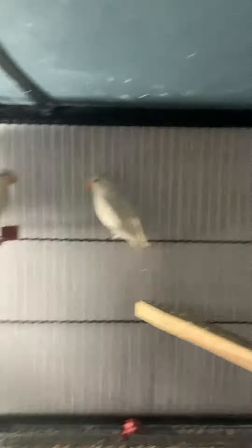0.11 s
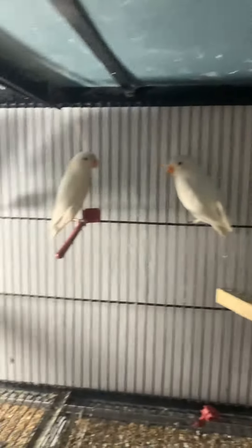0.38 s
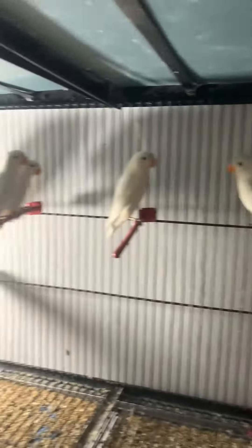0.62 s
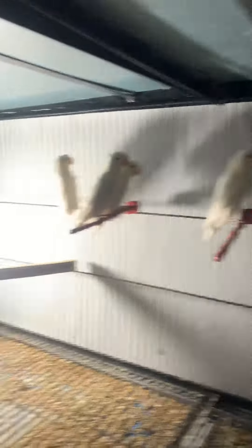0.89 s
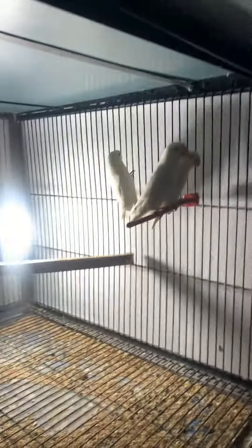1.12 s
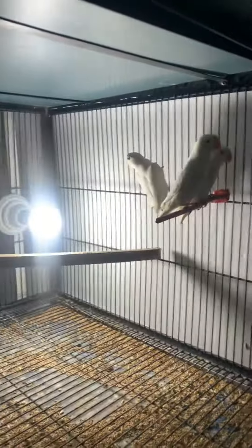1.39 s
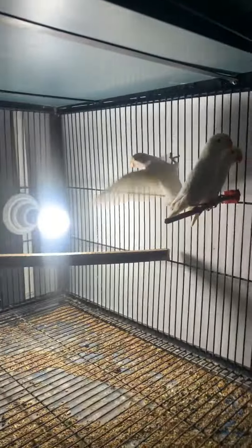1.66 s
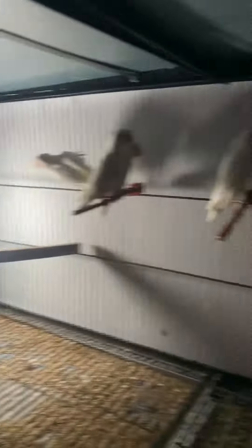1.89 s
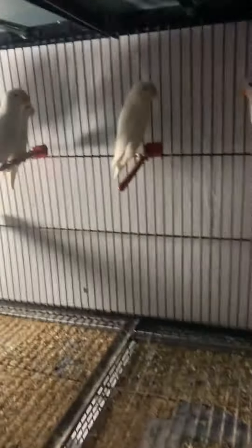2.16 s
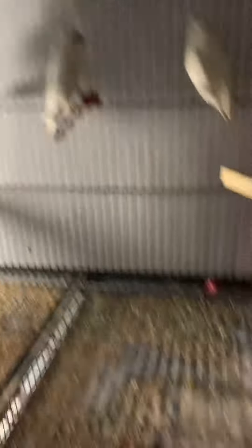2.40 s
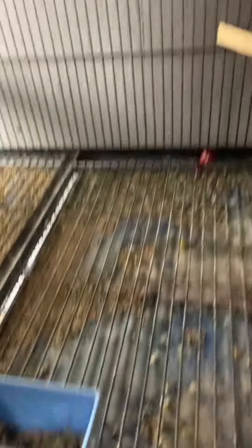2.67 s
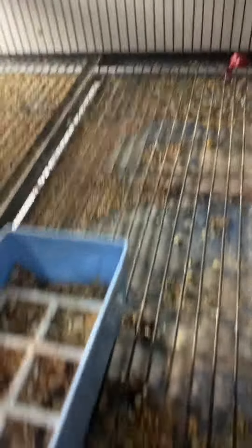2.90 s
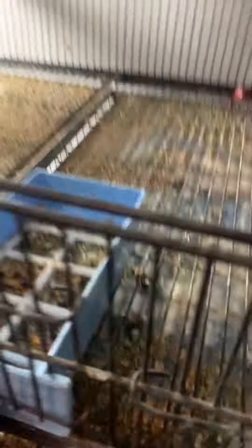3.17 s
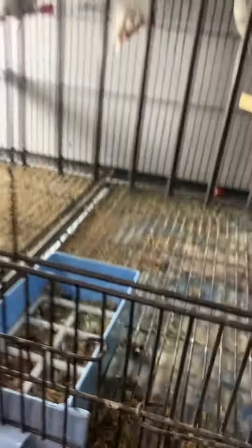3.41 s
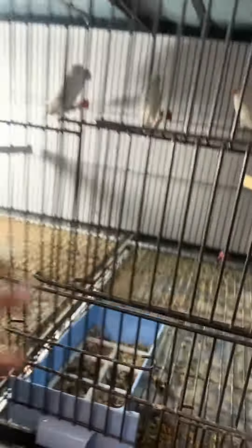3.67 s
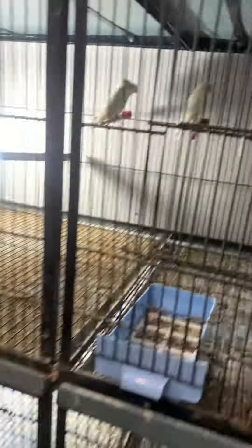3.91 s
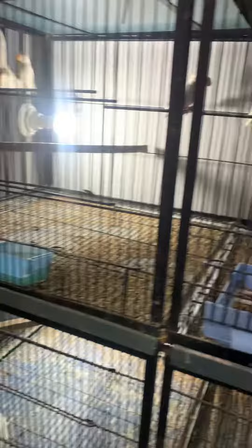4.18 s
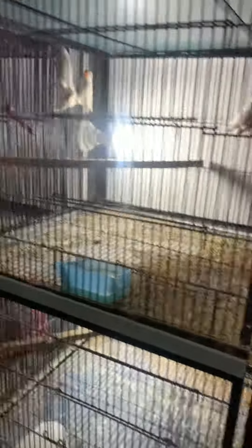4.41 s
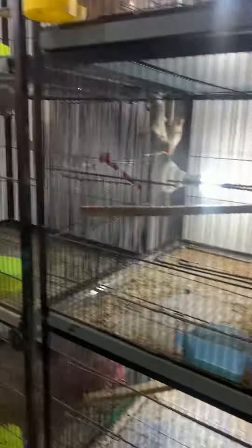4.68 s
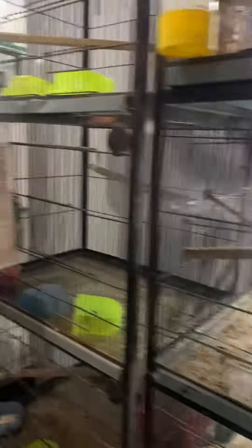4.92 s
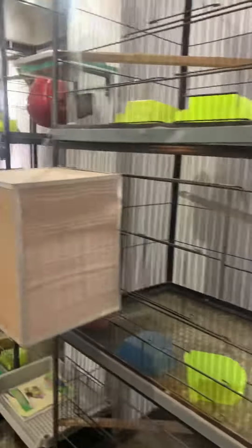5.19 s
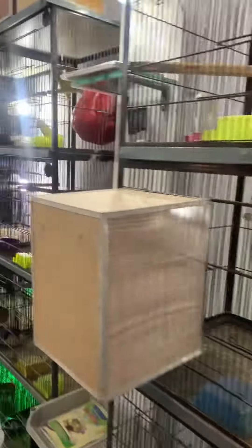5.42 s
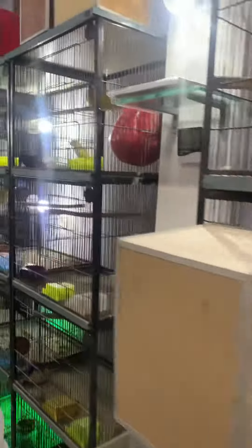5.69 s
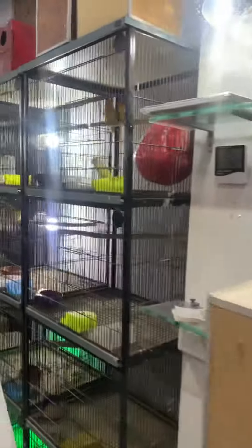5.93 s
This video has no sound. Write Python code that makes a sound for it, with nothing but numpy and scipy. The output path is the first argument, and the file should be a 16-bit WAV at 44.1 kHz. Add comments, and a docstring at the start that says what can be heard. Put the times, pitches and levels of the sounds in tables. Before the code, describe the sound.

A phone moves through a hard-walled bird room. Faint distant whistles echo over a wavering low hum and soft rumble, then a very brief close chirp whips upward. Calls grow brighter, cage wire ticks and rattles, and handling swells. A second sharp chirp lands amid the busiest clatter. Afterwards the ticking stops, a thin low tone fades, and scattered bird calls become denser and louder toward the end.

```python
"""Six seconds among small caged parrots in a hard-walled bird room, on a moving phone with two microphone ports.
From the start a wavering hum, a low rumble and rustle (sine and coloured noise) swell as the phone is carried
about, and distant birds call: harmonic whistles with sparse echoes and a trailing hiss. After a second, claws
and husks tick on cage wire as noise bursts through resonators; near 1.8 and 3.1 s a chirp sweeps up close by.
A thin steady tone sets in at 3.9 s and fades."""
import sys
import numpy as np
from scipy import signal
from scipy.fft import rfft, irfft, next_fast_len
from scipy.io import wavfile
from scipy.ndimage import uniform_filter1d

SR = 44100
rng = np.random.default_rng(int(sys.argv[2]) if len(sys.argv) > 2 else 0)


def makeup_ratio(level_db):
    """Linear amplitude ratio for a level in decibels (20 dB per factor of ten)."""
    decades = np.asarray(level_db, float) / 20
    return 10 ** decades


def unload_audio(sound):
    """Save the sound as a 16-bit wav file, at the path given as the first command line argument."""
    columns = np.transpose(np.atleast_2d(sound))
    # keep every value between -1 and 1, then stretch to whole-number steps
    steps = np.round(np.clip(columns, -1, 1) * 32767)
    wavfile.write(sys.argv[1], SR, steps.astype(np.int16))


N = 267422


def evened(x):
    """Scales to rms 1."""
    return x / np.sqrt(np.mean(x ** 2) + 1e-20)


def read(points, hz):
    """Reads a spectrum on a log-frequency axis."""
    f, value = np.transpose(points)
    return np.interp(np.log(hz + 1), np.log(f + 1), value)


def add(mix, s, sound):
    """Mixes a sound in at s seconds."""
    part = mix[round(s * SR):][:len(sound)]
    part += sound[:len(part)]


def slow(count, span):
    """Smooth random wander of rms 1 that changes over span seconds."""
    size = max(round(span * SR), 1)
    once = uniform_filter1d(rng.standard_normal(count), size)
    return evened(uniform_filter1d(once, size))


def noise(spectrum, patchy_db):
    """Two unrelated channels of coloured noise, rms 1, with patches that drift in time and frequency."""
    frames, hz = N // 256 + 5, np.fft.rfftfreq(1024, 1 / SR)
    z = rng.standard_normal((frames, 513, 5)).T
    patches = evened(uniform_filter1d(uniform_filter1d(z[4], 10, 0), 8, 1))
    gain = makeup_ratio(read(spectrum, hz)[:, None] + patchy_db * patches)
    bins = (z[:2] + 1j * z[2:4]) * gain
    return evened(signal.istft(bins, nperseg=1024, noverlap=768)[1][:, :N])


def handling(count):
    """Fingers shifting on the phone: short dull grains of scattered pitch and size."""
    out, t = np.zeros(N), np.arange(1500) / SR
    for hz in np.geomspace(170, 600, count):
        struck = rng.random(N) < 9 / SR  # nine grains a second at each pitch
        sizes = makeup_ratio(2.26 * np.minimum(rng.exponential(1, N), 4)) * struck
        grain = np.sin(2 * np.pi * hz * t) * t * hz * np.exp(-t * hz / 4.7)
        out += signal.oaconvolve(sizes, grain)[:N]
    return evened(out)


def distant_notes():
    """All far notes as (start s, length s, first Hz, last Hz, level dB, harshness); held ones sag in pitch."""
    # Held notes. Each row: start in seconds, length in seconds, pitch in Hz, level in dB, harshness 0-1.
    held = [(0.073, 0.045, 3710, -57, 0.56), (0.087, 0.072, 4140, -44.5, 0.58),
            (0.096, 0.06, 5730, -41, 0.66), (0.155, 0.064, 5250, -37, 0.68), (0.219, 0.11, 4400, -42, 0.68),
            (0.223, 0.12, 5010, -39, .45), (0.229, 0.14, 2233, -51.5, 0.57), (0.314, 0.084, 3294, -54, 0.8),
            (0.4, 0.082, 2170, -51, 0.37), (0.601, 0.066, 4350, -45, 0.64),
            (0.646, 0.042, 6180, -52.5, 0.72), (0.723, 0.048, 3694, -49.5, 0.67),
            (0.773, 0.046, 2000, -53.5, 0.4), (1.031, 0.12, 1466, -52, 0), (1.289, 0.062, 3580, -53, 0.89),
            (1.609, 0.09, 3755, -68, 0.66), (1.625, 0.052, 6200, -51, 0.29), (1.876, 0.022, 3180, -40, 1),
            (1.912, 0.055, 6390, -35, .65), (1.956, 0.025, 2450, -35.5, 0.23), (1.97, 0.11, 3750, -43, 0),
            (2.155, 0.058, 6050, -35.5, 0.68), (2.224, 0.035, 2170, -36, 0.78),
            (2.246, 0.075, 3550, -30, 0.14), (2.347, 0.053, 5870, -31.5, 0.45),
            (2.356, 0.068, 2976, -41, 0.25), (2.418, 0.071, 6134, -29, 0.26),
            (2.423, 0.061, 4950, -27, 0.88), (2.53, 0.087, 4190, -38.5, .85),
            (3.257, 0.076, 6360, -36.5, .8), (3.288, 0.059, 5200, -37.5, .75),
            (3.817, 0.019, 1800, -26, 0.34), (4.045, 0.072, 3074, -41.5, 0.61),
            (4.086, 0.054, 4494, -36.5, 0.16), (4.245, 0.091, 5850, -34.5, .85),
            (4.259, 0.035, 3070, -28, 0.28), (4.331, 0.042, 2545, -38.5, 1), (4.368, 0.04, 3403, -31, 0.1),
            (4.571, 0.034, 4340, -45.5, 0.99), (4.881, 0.098, 2838, -50.5, 0.43),
            (5.074, 0.081, 6840, -52.5, 1), (5.231, 0.039, 3010, -51, 0.94), (5.335, 0.05, 2574, -43.5, 1),
            (5.361, 0.052, 3880, -36, 0.73), (5.377, 0.051, 5100, -34.5, .15),
            (5.562, 0.033, 3040, -33.5, 0.08), (5.598, 0.031, 5320, -38, 0.6),
            (5.6, 0.026, 2360, -37, 0.93), (5.623, 0.038, 3910, -31, 0.3), (5.665, 0.02, 5350, -44, 0.3),
            (5.712, 0.036, 3070, -34, 0.2), (5.912, 0.027, 4560, -26, 0.81),
            (5.924, 0.034, 3070, -40, 0.88), (5.995, 0.037, 3050, -31.5, 1), (6.026, 0.03, 3850, -20, 0.45)]
    # Gliding notes. Each row: start and length in seconds, first and last pitch in Hz, level in dB, harshness 0-1.
    gliding = [(1.592, 0.14, 1657, 2058, -44, 0.89), (1.891, 0.057, 4660, 4380, -28, 0.5),
               (2.185, 0.056, 4035, 3823, -30.5, 0.3), (3.971, 0.056, 4273, 4094, -37, 0.62),
               (4.226, 0.07, 4335, 4640, -27, 0.5), (4.288, 0.061, 3765, 3530, -24.5, 0.38),
               (5.253, 0.078, 3940, 3760, -41.5, 1), (5.31, 0.07, 4420, 4740, -37, 0.9),
               (5.481, 0.052, 3984, 4134, -38.5, 0.55), (5.674, 0.048, 2468, 3010, -30.5, 0.36),
               (5.712, 0.019, 6420, 6200, -35, 0), (5.727, 0.035, 4500, 4446, -24, 0.34),
               (5.923, 0.044, 6750, 5900, -25.5, 0.78), (5.949, 0.055, 4130, 3550, -20.5, 0.38)]
    sag_per_s = 0.1195  # share of the pitch lost a second
    sagging = [(s, length, hz, hz * (1 - sag_per_s * length), db, harsh) for s, length, hz, db, harsh in held]
    return sagging + gliding


def flock_hiss(high):
    """A broad hiss that swells after each distant note and hangs in the room, and rides on the high rustle."""
    # Colour of the hiss. Each row: frequency in Hz, relative level in dB.
    hiss = [(1200, -41.5), (2500, 9), (4200, 12.5), (6300, 8.5), (8000, 1.5), (10500, -4.5), (12300, -1),
            (14000, -21), (16000, -23)]
    over_note_db, over_rustle_db = -10.5, -3
    rise_s, fall_s = 0.021, 0.073  # time constants of the power
    power, t = np.zeros(N), np.arange(SR) / SR
    swell = (1 - np.exp(-t / rise_s)) * np.exp(-t / fall_s)
    for s, length, _, _, db, _ in distant_notes():
        add(power, s, makeup_ratio(2 * (db + over_note_db)) * length / 0.065 * swell)  # longer notes leave more
    power += (makeup_ratio(over_rustle_db) * high) ** 2
    return np.sqrt(power) * noise(hiss, 4.7)


def background():
    """Lumpy rumble, frequency-wavering hum, thin tone, rustle and hiss, each on its own slow level."""
    # Swells as the phone is carried. Each row: time in seconds, rumble level in dB, low rustle level in dB.
    rustle = [(0.0, -60, -47), (0.17, -55, -56), (0.24, -42, -43), (0.89, -58.5, -60), (0.93, -53, -57),
              (1.69, -46.5, -58.5), (1.74, -53, -54.5), (1.89, -52, -61.5), (2.13, -44.5, -56),
              (2.21, -53, -60.5), (2.39, -26, -42.5), (2.56, -37, -49.5), (2.75, -36.5, -36.5),
              (2.97, -41.5, -41.5), (3.02, -39, -33), (3.24, -41, -47), (3.36, -33, -37), (3.56, -33, -40),
              (3.88, -42, -42), (3.98, -41.5, -50), (4.08, -51, -53), (4.59, -58.5, -53.5),
              (5.6, -49.5, -51.5), (6.06, -54, -47)]
    # High rustle. Each row: time in seconds, level in dB before the lift in the mix.
    high_rustle = [(0.0, -63), (0.79, -69.5), (1.72, -68), (1.74, -57), (2.01, -73), (2.45, -52.5),
                   (2.48, -67.5), (2.7, -54), (2.92, -56.5), (3.0, -55), (3.04, -45), (3.05, -51),
                   (3.07, -47.5), (3.14, -54.5), (3.8, -46.5), (4.1, -60), (4.69, -52.5), (5.35, -61),
                   (5.77, -53), (6.06, -51.5)]
    # Hum strength. Each row: time in seconds, level in dB.
    hum_level = [(0.0, -62), (0.2, -46), (0.91, -65.5), (0.96, -51), (1.18, -42.5), (1.4, -59),
                 (1.55, -38.5), (1.77, -42), (1.89, -59.5), (2.19, -46.5), (2.3, -63), (2.34, -48),
                 (2.77, -52.5), (3.12, -45), (3.16, -52), (3.7, -41.5), (4.39, -65.5), (5.32, -62),
                 (5.65, -44), (5.91, -59), (5.99, -51), (6.06, -80)]
    # Hum pitch before its waver. Each row: time in seconds, pitch in Hz.
    hum_pitch = [(0, 101), (2.3, 99.46), (3.3, 108), (3.8, 108.1), (5.4, 105), (6.06, 105.6)]
    # Colours of rumble, low rustle and high rustle. Each row: frequency in Hz, relative level in dB per Hz.
    rumble_colour = [(15, -60), (28, -30), (40, -9), (50, -3.5), (75, -15.5), (90, -9.5), (130, -27),
                     (300, -41)]
    low_colour = [(60, -45), (110, 8.5), (160, 13), (250, -18.5), (420, 3), (580, -7), (750, -28),
                  (1500, -47)]
    high_colour = [(300, -18), (700, 1.5), (1300, -0.5), (2000, -3), (3000, -6.5), (5000, -13.5),
                   (9000, -25.5)]

    t = np.arange(N) / SR
    s, *levels = np.transpose(rustle)
    rumble, low = (makeup_ratio(np.interp(t, s, c)) for c in levels)
    high, hum = (makeup_ratio(np.interp(t, *np.transpose(curve))) for curve in (high_rustle, hum_level))
    rumble = rumble * makeup_ratio(1.5 * slow(N, 0.043))  # lumps
    hum_hz = np.interp(t, *np.transpose(hum_pitch)) + 2.39 * slow(N, 0.036)
    tone = np.sqrt(2) * hum * np.sin(2 * np.pi * np.cumsum(hum_hz) / SR)

    since = t - 3.9  # seconds since the thin tone set in
    thin_db = -57.5 - 8.5 * since + 0.5 * slow(N, 0.046)  # fades 8.5 dB a second, wavers slightly
    thin = np.sqrt(2) * makeup_ratio(thin_db) * np.clip(since / 0.049, 0, 1) * np.sin(2 * np.pi * 303 * t)

    low_part = low * (0.9 * noise(low_colour, 2.4) + 0.47 * handling(count=12))
    high_part = makeup_ratio(8.5) * high * noise(high_colour, 4.56)
    return tone + thin + rumble * noise(rumble_colour, 1.7) + low_part + high_part + flock_hiss(high)


def syrinx(hz, overtone_db, rough, shake, flutter):
    """A harmonic whistle through the beak; roughness shakes and bends its pitch, the membrane flutters its strength."""
    # Response of the beak. Each row: frequency in Hz, gain in dB.
    beak = [(1500, -9), (2500, 0.5), (6500, 0), (8500, -4.5), (10500, -8), (12200, 0), (13500, -8.5),
            (16000, -33)]
    hz = hz * (1 + rough * (shake * slow(len(hz), .0004) + .045 * slow(len(hz), .008)))
    turns = 2 * np.pi * (np.cumsum(hz) / SR + rng.random())
    tone = np.zeros(len(hz))
    for k in range(1, 7):
        gain = makeup_ratio(overtone_db * (k - 1) + read(beak, abs(k * hz)))
        tone += gain * np.sin(k * turns + k * k)
    return np.sqrt(2) * tone * (1 + flutter * slow(len(hz), 0.0011))


def echo(x, early_s):
    """Sparse reflections, other ones in each channel, building up over early_s; each band dies at its own speed."""
    # Decay of the hard-walled room. Each row: frequency in Hz, t60 in seconds.
    walls = [(1500, 0.33), (3000, 0.62), (6000, 0.5), (12000, 0.28)]
    taps = np.zeros((2, SR))
    at = np.arange(40, SR - 20, 20) + rng.integers(0, 20, (2, (SR - 41) // 20))
    np.put_along_axis(taps, at, rng.choice([-1., 1.], at.shape), 1)
    hz, t, z = signal.stft(taps, SR, nperseg=128)
    fall = makeup_ratio(-60 * t / read(walls, hz)[:, None]) * (1 - np.exp(-t / early_s))
    tail = signal.istft(z * fall, SR, nperseg=128)[1]
    return signal.fftconvolve(x[None], tail / np.linalg.norm(tail[0]), axes=1)[:, :N]


def far_birds():
    """Each note starts with a rasp and a quick upward scoop, then holds or glides; three cage rows echo apart."""
    # Colour of the opening rasp. Each row: frequency in Hz, relative level in dB per Hz.
    rasp_colour = [(1200, -67), (2200, -0.5), (3300, -1.5), (5500, 3.5), (7000, -10), (10000, -4),
                   (12500, -5.5), (15000, -38)]
    pure_db, harsh_db = -29, -3.5  # step from overtone to overtone of a pure and of a harsh note
    rows, rasp = np.zeros((3, N)), np.zeros(N)
    for k, (s, length, hz0, hz1, db, harsh) in enumerate(distant_notes()):
        t = np.arange(round(length * SR)) / SR
        scoop = 1 - .06 * np.exp(-t / .004)
        hz = (hz0 + (hz1 - hz0) * t / t[-1]) * scoop
        swell = makeup_ratio(db) * (1 - np.exp(-t / .005)) * np.minimum((t[-1] - t) / .012, 1)
        overtone_db = pure_db + (harsh_db - pure_db) * harsh ** 0.45
        rough = 1.081 * harsh ** 1.356
        add(rows[k % 3], s, swell * syrinx(hz, overtone_db, rough, .045, .45))
        add(rasp, s, (.15 + harsh) * swell * np.exp(-t / .045))
    rows[0] += makeup_ratio(-3.5) * rasp * noise(rasp_colour, 1.2)[0]
    return makeup_ratio(-2.0) * rows.sum(0) + makeup_ratio(1.0) * sum(echo(row, 0.0019) for row in rows)


def wire_ticks():
    """A snap, then a short rattle, coloured by the broad rings of the wire; the two lowest rings are the thud."""
    # Ticks. Each row: start in seconds, relative level in dB, dull thud against the bright part in dB, t60 in seconds.
    ticks = [(1.0723, -51, -9, 0.051), (1.16, -53, -5, 0.06), (1.528, -46.5, -27, 0.43),
             (2.2952, -27.5, -25, 0.077), (2.4177, -15.5, -36, 0.11), (2.517, -27.5, -24, 0.13),
             (2.6478, -26.5, -5, 0.1), (2.822, -32, -10, 0.061), (2.9386, -32, 0, 0.095),
             (2.957, -27, -16, 0.052), (2.9764, -10.5, -6.5, 0.046), (3.0178, -19.5, -2.5, 0.036),
             (3.0318, -13.5, 0, 0.046), (3.0678, -23, -2.5, 0.05), (3.22, -28.5, -3, 0.058),
             (3.434, -31, -16, 0.1), (3.527, -20.5, -10, 0.28), (3.581, -28.5, 4.5, 0.03),
             (3.653, -25, -19.5, 0.025), (3.7484, -31.5, 2.5, 0.39), (3.8452, -36, 2, 0.051),
             (3.8755, -30.5, -19, 0.069), (5.5974, -40, -10, 0.06)]
    # Rings of the wire. Each row: frequency in Hz, width in Hz, relative level in dB.
    wire = [(950, 1100, -3), (1580, 900, 4.5), (3100, 350, -7.5), (6500, 15500, -4.5), (9400, 1900, -8.5),
            (12600, 2000, -9)]
    out, t = np.zeros(N), np.arange(5000) / SR
    for s, db, thud_db, t60 in ticks:
        snap_and_rattle = np.exp(-t / .001) + .75 * makeup_ratio(-60 * t / t60)
        rattle = rng.standard_normal(len(t)) * snap_and_rattle * (1 - np.exp(-t / .0004))
        for k, (hz, width, ring_db) in enumerate(wire):
            ring = signal.lfilter(*signal.iirpeak(hz, hz / width, SR), rattle)
            add(out, s, makeup_ratio(db + ring_db + thud_db * (k < 2) - 2) * ring)
    return out + makeup_ratio(-11.0) * echo(out, 0.0013)


def cage(x):
    """A few strong reflections from the tray and walls close by, then the room."""
    # Nearest reflections; the opposite channel has each sooner and louder. Each row: delay in seconds, level in dB.
    reflections = [(.0021, -5), (.0037, -7), (.0056, -10), (.0083, -14), (.012, -18)]
    out = np.array([x, x])
    for k, (delay, db) in enumerate(reflections):
        out[k % 2] += makeup_ratio(db) * np.roll(x, round(delay * SR))
        out[1 - k % 2] += makeup_ratio(db + 5.5) * np.roll(x, round(0.82 * delay * SR))
    return out + makeup_ratio(-14.5) * echo(x, 0.00071)


def near_birds():
    """Short sweeping chirps, mostly direct, with the cage and room behind them."""
    # One table a close chirp, a tick and a low croak that whips up into a whistle.
    # Each row: time in seconds, pitch in Hz, level in dB, roughness from 0 to about 1.
    chirps = [
        [(1.758, 2556, -25, 1.1), (1.760, 2416, -32, 1.11), (1.763, 2200, -36, 0.77), (1.7650, 2226, -15, 0.06),
         (1.771, 2290, -13.5, 0.1), (1.7725, 2715, -18, .4), (1.775, 5120, -6.5, 0.08),
         (1.779, 6680, -10.5, 0.04), (1.787, 6450, -16.5, 0.26), (1.790, 6100, -25, .3)],
        [(3.106, 3460, -23, 0.7), (3.108, 3380, -20, .7), (3.111, 3100, -33, 0.77), (3.114, 3100, -36, 0.77),
         (3.117, 3530, -15.5, 0.55), (3.120, 4260, -11, 0.15), (3.123, 5660, -4, 0.2),
         (3.128, 6030, -12.5, 0.31), (3.134, 5695, -17.5, 0.12), (3.149, 6080, -16, 0.02),
         (3.157, 5970, -26, 0.3)],
    ]
    close = np.zeros(N)
    for rows in chirps:
        s, *columns = np.transpose(rows)
        t = np.arange(s[0], s[-1], 1 / SR)
        hz, db, rough = (np.interp(t, s, c) for c in columns)
        # overtone step in dB: all croak below 3770 Hz, all whistle above 5230 Hz
        overtone_db = np.interp(hz, [3770, 5230], [-0.5, -7])
        strength = np.sqrt(sum(makeup_ratio(2 * k * overtone_db) for k in range(4)))
        voice = syrinx(hz, overtone_db, rough, 0.136, 0.13) / strength
        add(close, s[0], makeup_ratio(db) * voice)
    return cage(close)


def scene():
    """All sources, as two unlike views of the room."""
    return background() + far_birds() + wire_ticks() + near_birds()


def roll_off(x):
    """The treble ends steeply here."""
    return signal.sosfilt(signal.butter(12, 14090, fs=SR, output="sos"), x)


def record(dry):
    """The phone: gain ducks after loud sound, microphones roll off, ports share sound out of phase."""
    # The two ports. Each row: frequency in Hz, likeness 0-1, lead of the left port in radians.
    port_table = [(0, .95, 0), (250, .85, -.2), (430, .68, -.2), (600, .6, -1.4), (750, .65, -3.1),
                  (1030, .6, -3.6), (1650, .3, -5.3), (2200, .5, -3.6), (2900, .55, -3.5), (3900, .5, -4.7),
                  (4600, .8, -3.5), (5300, .75, -3), (5990, .55, -1.3), (6700, .95, -.1), (7400, .98, 0),
                  (8400, .55, 1.6), (9300, .99, 3.1), (10200, .99, 3.2), (11150, .6, 5.1),
                  (11900, .96, 6.1), (13200, .9, 6.6), (13900, .7, 9.1), (15600, .95, 9.4)]
    power_db = 10 * np.log10(abs(uniform_filter1d((dry ** 2).mean(0), 300)) + 1e-12)
    fall = np.arange(N) * 60. / SR  # the held peak level falls 60 dB a second
    held_db = np.maximum.accumulate(power_db + fall) - fall
    over_db = np.maximum(held_db + 20.5, 0)
    ducked = dry / makeup_ratio(0.23 * uniform_filter1d(over_db, 300, origin=149))  # averages the past only
    ducked = signal.sosfilt(signal.butter(3, 14000, fs=SR, output="sos"), ducked)  # top of the microphone
    ducked = signal.sosfilt(signal.butter(5, 38, "high", fs=SR, output="sos"), ducked)  # and its bottom

    size = next_fast_len(N + 4096)
    f, same, lead = np.transpose(port_table)
    hz = np.fft.rfftfreq(size, 1 / SR)
    same = np.interp(hz, f, same)
    turn = np.exp(.5j * np.interp(hz, f, lead))  # half the lead on each port
    a, b = rfft(ducked, size)
    middle = (a + b) / 2 * np.sqrt(1 + same)
    side = (a - b) / 2 * np.sqrt(1 - same)  # alike ports keep little of what differs between the two views
    ports = irfft(np.array([(middle + side) * turn, (middle - side) / turn]), size)[:, :N]
    return roll_off(np.clip(ports, -.88, .88))  # a ceiling keeps the loudest peaks within range


dry = scene()
out = record(dry)
unload_audio(out)
```